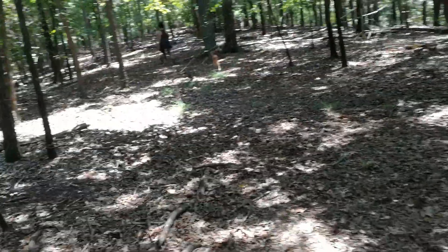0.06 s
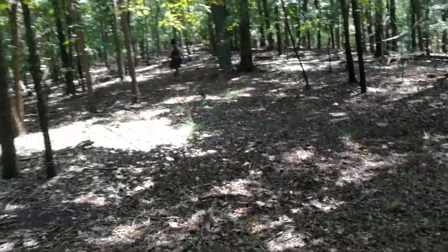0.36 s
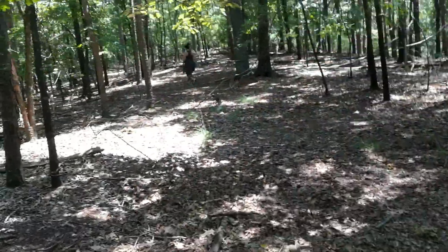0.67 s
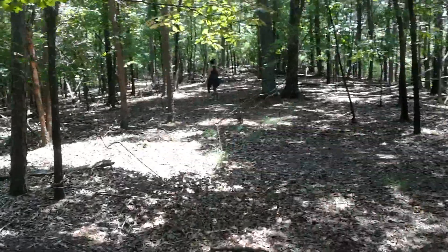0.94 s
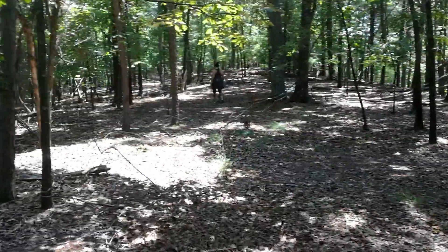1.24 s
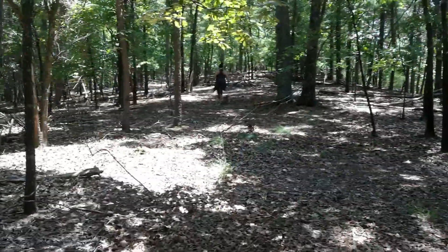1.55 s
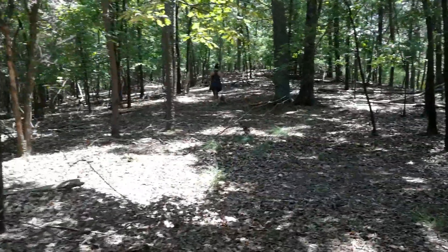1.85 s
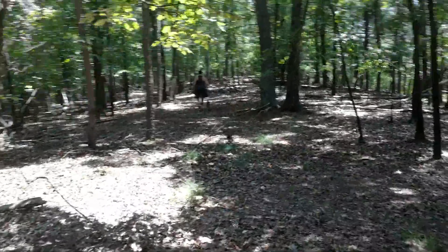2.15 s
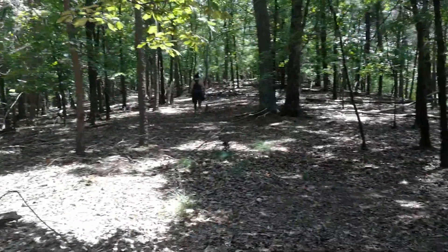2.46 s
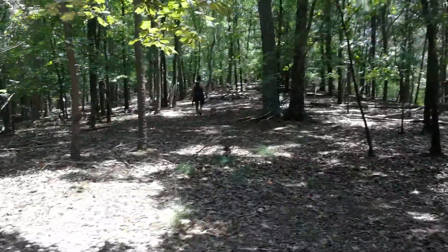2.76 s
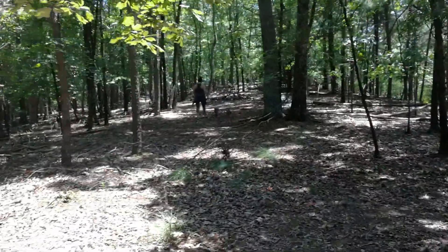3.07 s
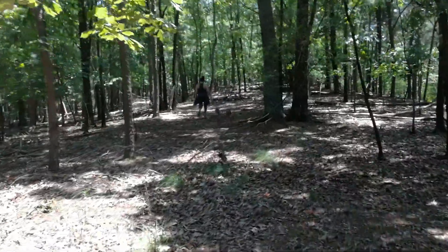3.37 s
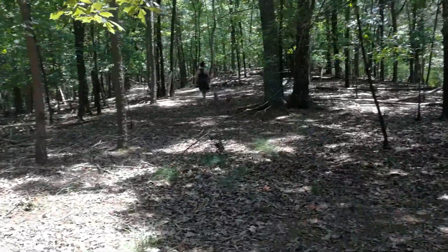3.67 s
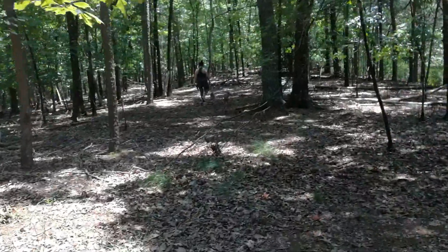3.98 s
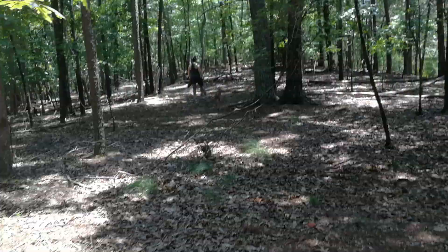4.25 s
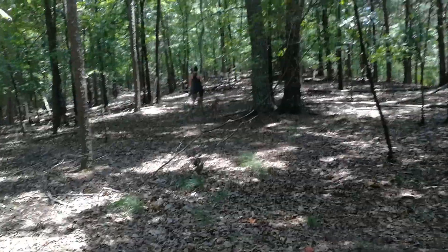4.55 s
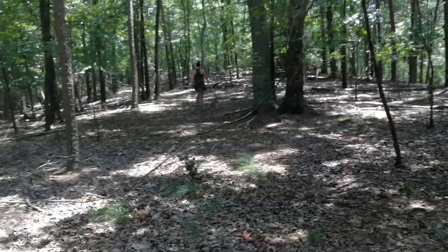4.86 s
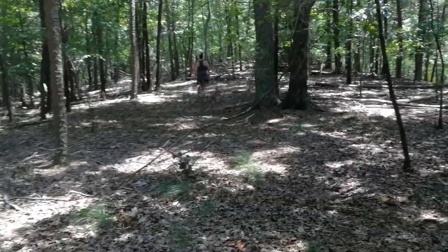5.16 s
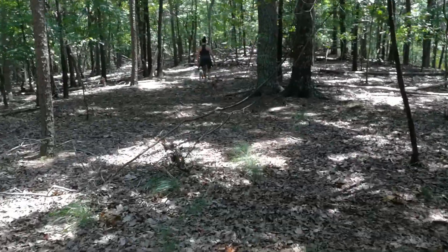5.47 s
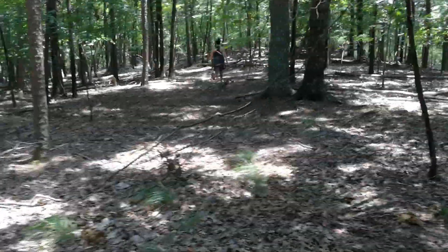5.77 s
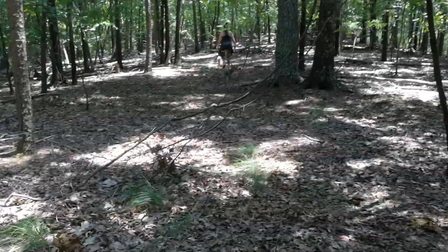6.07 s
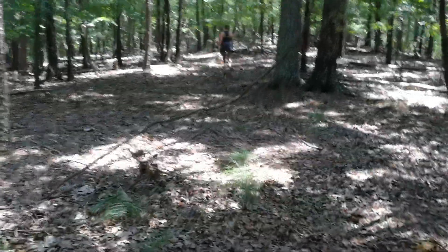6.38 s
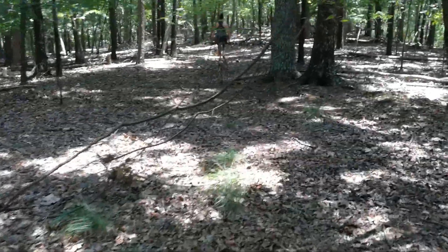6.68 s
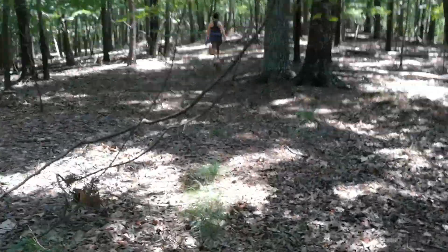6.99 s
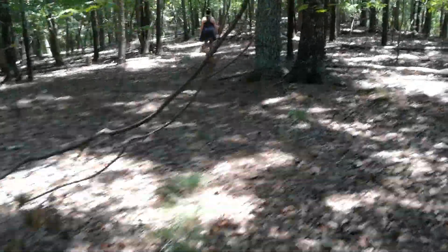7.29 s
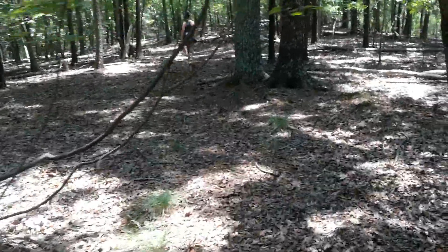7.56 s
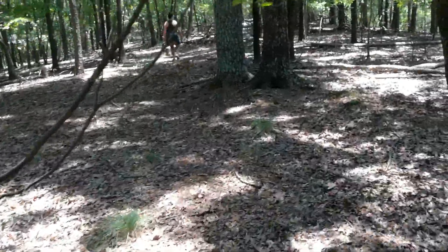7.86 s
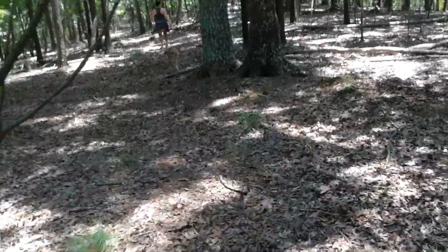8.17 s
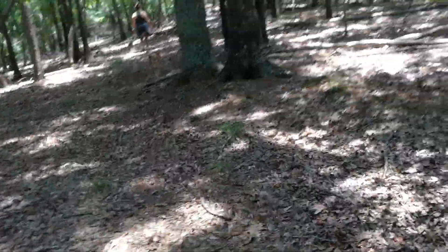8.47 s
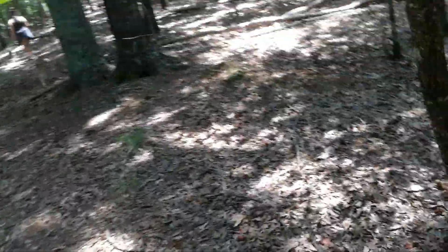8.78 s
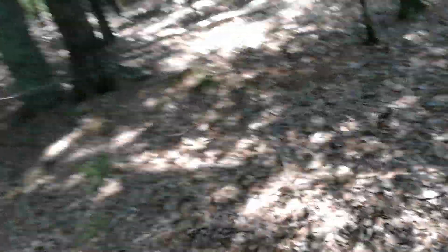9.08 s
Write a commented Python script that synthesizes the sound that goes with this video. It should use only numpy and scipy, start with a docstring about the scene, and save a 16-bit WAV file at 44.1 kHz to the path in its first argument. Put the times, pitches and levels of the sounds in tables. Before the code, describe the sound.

Slow footsteps move through dry leaves in a summer wood for about nine seconds, close below the microphone, roughly two steps a second. Brittle leaves crackle on top, the packed layer crunches below, and buried twigs give dull pops. Some heels thud on the soil and the microphone takes an occasional soft bump. The steps echo only faintly among the trees. They grow heavier from about 4.3 to 5 seconds, followed by a few sharp stalk snaps, then turn lighter from about 6.5 to 8. The last two steps, near 8.5 and 8.9 seconds, are loud and crisp, with twigs cracking. Cicadas buzz steadily in the background throughout, slightly to the left, and the nearest, shriller one swells from about 6 seconds. A light wind flutters and rumbles unevenly on the microphone, fading away after about 8 seconds.

```python
"""Slow footsteps crush dry leaves in a summer wood.
Under each foot brittle leaves crackle on top, the packed layer crunches below, and twigs snap and knock.
Some heels thud on the soil, and jolts bump the microphone. The steps echo faintly among the trees.
Behind them cicadas buzz steadily and a light wind flutters at the microphone."""
import sys
import numpy as np
from scipy import signal
from scipy.fft import rfft, irfft, next_fast_len
from scipy.io import wavfile
from scipy.ndimage import uniform_filter1d, map_coordinates

SR = 44100
rng = np.random.default_rng(int(sys.argv[2]) if len(sys.argv) > 2 else 0)


def int16_out(signal):
    """Quantize to a 16-bit WAV file."""
    q = np.round(np.clip(np.atleast_2d(signal).T, -1, 1) * 32767)
    wavfile.write(sys.argv[1], SR, q.astype(np.int16))


N = 402633

# Levels in the tables are relative: the functions turn them up or down in the mix.
# wind strength at the microphone: t/s, flutter level/dB, buffet level/dB
WIND_LEVELS = [(0.0, -39, -60), (0.05, -41, -47), (0.15, -48, -50), (0.66, -52, -65.5), (0.71, -39, -62),
               (0.81, -45, -62), (0.86, -47, -43), (0.94, -51, -69), (1.09, -51, -53.5), (1.19, -52, -71),
               (1.32, -42, -43), (1.83, -50, -64.5), (1.93, -37, -57), (2.26, -46.5, -59),
               (2.34, -48, -48.5), (2.64, -56, -65), (2.7, -59, -49.5), (2.84, -45, -53), (2.95, -64, -72),
               (3.05, -49, -62), (3.23, -46, -48), (3.31, -50, -61.5), (4.07, -52.5, -48), (4.17, -55, -62),
               (4.42, -44, -42), (4.6, -50.5, -58.5), (4.98, -53, -50), (5.36, -53, -63),
               (5.64, -42, -40.5), (5.8, -54.5, -61), (5.9, -44, -49), (6.03, -49.5, -62), (6.08, -47, -51),
               (6.28, -59, -50.5), (6.56, -48.5, -67), (6.87, -51.5, -49), (7.45, -57, -63),
               (7.53, -76, -69), (7.86, -43.5, -55), (8.01, -49.5, -51.5), (8.14, -77, -71),
               (8.52, -61, -63), (8.62, -76, -69.5), (9.13, -80, -72)]
# tone of the steady air, slow rumble, low flutter and gusty buffeting: f/Hz, level/dB
AIR_TONE = [(20, 2.5), (120, 5), (250, -3), (450, -12), (1000, -16), (1800, -12.5), (2500, -13),
            (8000, -22), (16000, -19)]
RUMBLE_TONE = [(15, -1), (30, 1), (45, -16), (80, -29)]
FLUTTER_TONE = [(20, -24), (32, -11), (44, 7.5), (55, 2), (80, -11), (140, -20.5), (220, -29.5), (400, -50)]
BUFFET_TONE = [(30, -28), (70, 5), (120, 5.5), (170, -2.5), (250, -14.5), (400, -36.5), (800, -35)]
# how alike background noise is left and right: f/Hz, likeness (1 same, 0 unrelated, -1 opposite)
STEREO_LIKENESS = [(100, 0.7), (300, 0.82), (550, -0.57), (1000, -0.23), (1700, 0.84), (2500, 0.066),
                   (8000, -0.044)]
# loudness of the cicadas: t/s, chorus level/dB, nearest cicada level/dB
CICADA_LEVELS = [(0, -59, -58), (1, -56.5, -54), (3, -57.5, -54.5), (4.7, -56, -52.5), (6, -57.5, -49.5),
                 (6.7, -56.5, -49.5), (7.5, -57, -46.5), (8.2, -55, -48.5), (9.13, -54.5, -45)]
# tone of the far chorus and of the nearest cicada: f/Hz, level/dB
CHORUS_TONE = [(2750, -24), (3050, -9), (3400, 1.5), (4100, 1), (4700, 3.5), (5500, 3.5), (7500, -4),
               (9000, -25), (10500, -14), (13000, -10), (16000, -46)]
NEAR_CICADA_TONE = [(4500, -20.5), (6000, -1.5), (6900, 4.5), (7600, 4), (8400, 0), (9300, -7),
                    (10800, -23), (13000, -15), (16000, -38)]
# single insects that stand out (silent unless start is before end): start/s, end/s, f/Hz, level/dB
SOLO_INSECTS = [(0, 4, 3080, -67.5), (0, 4.5, 6550, -64), (3.8, 8.1, 3740, -68), (4.3, 8.8, 5020, -59),
                (4.4, 7.3, 7900, -83), (6.8, 6.5, 3430, -53)]
# echo among the trunks: f/Hz, time to fade by 60 dB/s
ECHO_TIMES = [(200, 0.048), (2000, 0.28), (12000, 0.078)]
# how much louder the ground sounds on the left: f/Hz, left minus right/dB
GROUND_BALANCE = [(250, 2.5), (550, -1), (1100, -3.5), (2100, 1), (4000, 5.5), (8000, -2), (12000, 5)]
# how far ahead waves from the ground are on the left: f/Hz, phase lead/rad
GROUND_PHASE = [(0, -1), (1720, -0.5), (2670, 3.5), (4310, 8.5), (5770, 12.5), (8700, -6.0), (11600, -10.5),
                (16600, -4.5)]
# soft swishes, like clothing as a leg swings: middle t/s, half length/s, f/Hz, level/dB
SWISHES = [(0.008, 0.084, 1980, -49), (0.73, 0.14, 1775, -63), (0.914, .05, 1780, -58),
           (1.3, .07, 1776, -63), (2.348, 0.21, 1730, -66), (2.764, 0.32, 1800, -68.5),
           (3.628, 0.12, 1855, -64)]
# dull thuds of heels on soil, and deeper bumps as the microphone is jolted: t/s, level/dB, f/Hz
LOW_THUDS = [(0.05, -34, 110), (0.112, -42, 280), (0.853, -40, 140), (1.985, -40, 139), (3.241, -37, 576),
             (3.349, -51, 447), (3.909, -44, 550), (4.437, -41, 400), (4.901, -39, 420), (4.922, -31, 320),
             (5.036, -41, 307), (6.238, -39.5, 150), (6.759, -38, 129), (6.892, -41, 158),
             (8.50, -30.5, 666), (8.915, -33.5, 600)]
# twigs give way under the leaves: t/s, level/dB, f/Hz
TWIG_KNOCKS = [(0.309, -31.5, 1010), (0.477, -42.5, 1440), (0.534, -49, 904), (0.741, -34.5, 1860),
               (0.986, -28.5, 1150), (1.103, -38, 1330), (1.147, -39, 1470), (1.518, -26.5, 1620),
               (2.025, -31, 1790), (2.143, -23, 993), (3.242, -29, 1020), (3.348, -25.5, 1200),
               (3.478, -43, 1250), (3.602, -33.5, 1640), (3.831, -29.5, 1410), (4.033, -34, 1450),
               (4.349, -32, 1830), (4.436, -25, 1170), (4.58, -26, 1570), (4.678, -33, 1220),
               (4.713, -33, 1300), (4.976, -27.5, 1580), (5.037, -26, 890), (5.535, -43, 1120),
               (5.727, -29.5, 1040), (6.129, -29, 1400), (6.667, -43.5, 1690), (6.792, -31.5, 960),
               (6.845, -35.5, 1020), (7.181, -29, 1340), (7.406, -33, 1080), (7.64, -46, 1910),
               (7.689, -43, 1550), (8.366, -38, 2000), (8.502, -22, 960), (8.916, -25.5, 870)]
# dry stalks snap: t/s, level/dB, f/Hz
STALK_SNAPS = [(0.1101, -28, 6800), (1.5774, -33, 6070), (1.926, -32, 13500), (2.5838, -32, 11700),
               (3.2469, -28, 6900), (4.445, -25.5, 11100), (5.1434, -23, 8730), (5.174, -24.5, 9070),
               (5.218, -23.5, 13600), (5.8012, -39, 7450), (6.2487, -32, 6560), (8.4655, -17.5, 9400),
               (8.6775, -20, 7000)]
# a sole slaps into loose leaves: t/s, level/dB, time to fade by 60 dB/s, centre f/Hz
LEAF_SLAPS = [(0.109, -35, .09, 6500), (0.828, -29.5, 0.18, 9600), (0.996, -34, 0.11, 3300),
              (1.437, -28, 0.11, 11000), (1.50, -33.5, 0.36, 3800), (2.025, -42, .1, 7000),
              (3.227, -42, 0.24, 7000), (3.783, -32, 0.26, 9000), (4.2963, -28.5, 0.26, 8900),
              (4.395, -35, 0.097, 9700), (4.4375, -31.5, 0.09, 6000), (4.888, -30.5, 0.075, 6000),
              (4.903, -28, 0.13, 6960), (4.926, -26, 0.1, 9450), (5.699, -44, 0.077, 6000),
              (6.169, -38, 0.21, 5000), (6.793, -34, 0.056, 4970), (7.869, -36, 0.22, 10000),
              (8.9156, -24, 0.51, 6300), (8.977, -24.5, 0.16, 9000)]
# the swinging foot grazes the leaves: middle t/s, half length/s, level/dB, brittle leaf boost/dB
SCUFFS = [(0.024, 0.076, -56.5, -19), (0.395, 0.046, -62.5, 8.5), (1.098, 0.067, -57.5, 3.5),
          (5.52, 0.046, -64.5, 9.5), (6.703, 0.14, -68.5, -1), (7.534, 0.025, -62, 6),
          (8.293, 0.048, -66.5, 11.5), (8.903, .02, -51, 8)]
# footfalls: t/s, heel level/dB, weight delay/s, weight stay/s, weight level/dB, brittle leaf boost/dB
FOOTFALLS = [(0.108, -58.5, 0.087, 0.11, -51.5, 6.5), (0.817, -43.5, 0.12, 0.047, -49, 3.5),
             (1.368, -57, 0.062, .16, -46.5, 2), (1.895, -57, 0.15, 0.13, -48, 1.5),
             (2.584, -51, .07, 0.15, -56, -8), (3.223, -49, 0.11, 0.018, -55, 2.5),
             (3.72, -55, 0.084, 0.13, -48.5, 6), (4.29, -44, 0.19, 0.095, -49, 2.5),
             (4.886, -42.5, 0.098, 0.21, -49, 6), (5.612, -61, 0.12, 0.055, -48.5, 2),
             (6.044, -50, .14, 0.1, -51, -1.5), (6.77, -53, 0.082, 0.022, -57, -8),
             (7.334, -59.5, 0.045, 0.075, -54, 1.5), (7.815, -56, .14, 0.037, -54, 3.5),
             (8.464, -43, 0.11, 0.085, -50.5, 6.5), (8.906, -47, 0.022, 0.2, -50.5, 12.5)]
# tone of the litter (the packed layer of old leaves) and the brittle leaves on top: f/Hz, level/dB
LITTER_TONE = [(120, -65), (250, -11.5), (500, -14), (900, -1.5), (1600, 1), (2500, -3.5), (4000, -12.5),
               (7000, -77)]
BRITTLE_TONE = [(1000, -10), (2200, -3), (3500, 1), (5200, 0), (7000, -4), (9000, 7.5), (11500, 1),
                (15000, 3), (16000, -16)]

HEEL_ATTACK_S, HEEL_FALL_DB_PER_S = 0.0071, 117
LOAD_DB_PER_S, LIFT_DB_PER_S = 192, 172  # the weight rolls on and off
BRUSH_DB, BRUSH_DB_PER_S = -19, 220  # the sole brushes the top leaves as it lands
STIR_DB, STIR_DB_PER_S, SETTLE_DB_PER_S = -15.5, 50, 59  # leaves stir before the weight, settle after
LITTER_DB, BRITTLE_DB = 2, 3
TOP_HZ = 15950


def amp(db):
    """Turn decibels into a number to multiply a sound by."""
    return 10 ** (np.asarray(db) / 20)


def unit(x):
    """Scale a sound so its average strength (rms) is 1."""
    return x / np.sqrt(np.mean(x ** 2) + 1e-20)


def along(points, hz):
    """Read between (frequency, value) points, spacing octaves evenly."""
    freqs, values = np.transpose(points)
    return np.interp(np.log(hz + 1), np.log(freqs + 1), values)


def curves(rows):
    """Turn each column after the time into a curve with one value per sample."""
    times, *columns = np.transpose(rows)
    return [np.interp(np.arange(N) / SR, times, column) for column in columns]


def wobble(rate):
    """A smooth random curve that picks `rate` new values a second."""
    values = rng.standard_normal(int(N * rate / SR) + 4)
    return map_coordinates(values, [np.arange(N) * rate / SR], order=2)


def filtered(x, response):
    """Multiply each frequency in a sound by response(hz)."""
    size = next_fast_len(x.shape[-1] + 8192)
    return irfft(rfft(x, size) * response(np.fft.rfftfreq(size, 1 / SR)), size)[..., :x.shape[-1]]


def coloured(x, tone):
    """Shape a sound with (frequency, dB) points, then scale it to strength 1."""
    return unit(filtered(x, lambda hz: amp(along(tone, hz))))


def panned(db):
    """Left and right gains that make the left louder by db."""
    return amp(np.array([[1], [-1]]) * db / 2)


def add(track, start, sound):
    """Mix a sound into a track, `start` seconds in."""
    part = track[..., max(round(start * SR), 0):][..., :sound.shape[-1]]
    part += sound[..., :part.shape[-1]]


def rush(tone, patchy_db):
    """Stereo noise whose narrow bands swell and fade, alike on both sides in the bass, not the treble."""
    bands = signal.stft(rng.standard_normal((2, N)), nperseg=1024)[2]
    patches = uniform_filter1d(rng.standard_normal(bands.shape[1:]), size=3, axis=0)
    patches = uniform_filter1d(patches, size=110, axis=1)  # smooth over time
    pair = signal.istft(bands * amp(patchy_db * unit(patches)), nperseg=1024)[1][:, :N]
    width = lambda hz: np.arccos(np.clip(along(STEREO_LIKENESS, hz), -1, 1)) / 2
    mid, side = filtered(pair, lambda hz: np.array([np.cos(width(hz)), np.sin(width(hz))]))
    return coloured(np.array([mid + side, mid - side]), tone)


def wind():
    """Swirls of air beat unevenly on the microphone; gusts sharpen the beats and add loose buffeting."""
    flutter_db, buffet_db = curves(WIND_LEVELS)
    swirl_hz = 46.5 * np.exp(.105 * wobble(22))
    swirl_count = np.floor(np.cumsum(swirl_hz) / SR)
    swirls = np.diff(swirl_count, prepend=0) * amp(2.9 * wobble(30))  # one tap per swirl
    rumble = coloured(rng.standard_normal(N), RUMBLE_TONE)
    flutter = (coloured(swirls, FLUTTER_TONE) + amp(-19) * rumble) * amp(flutter_db - 1 + wobble(14))
    beats = coloured(swirls * amp(3.5 * wobble(40)), BUFFET_TONE)
    buffet = beats * amp(-9) + rush(BUFFET_TONE, patchy_db=-2.5) * amp(-5.5)
    buffet *= amp(buffet_db + 3.5 + 0.85 * wobble(17))
    lag_s = np.array([[1], [-1]]) * 0.00035  # the air reaches the right side first
    buffet = filtered(buffet, lambda hz: np.exp(-2j * np.pi * hz * lag_s))
    return flutter + buffet * panned(1) + amp(-62.5) * rush(AIR_TONE, patchy_db=1.5)


def cicadas():
    """Far insects blur into a hiss with a few thin voices; the nearest buzzes by clicking tiny drums."""
    chorus_db, near_db = curves(CICADA_LEVELS)
    t = np.arange(N) / SR
    hiss = rush(CHORUS_TONE, patchy_db=2.2)
    chorus = hiss * amp(chorus_db + 2 + 1.2 * wobble(6.1)) * panned(4.7)
    for start, end, hz, db in SOLO_INSECTS:
        swell = np.clip(np.minimum(t - start, end - t) / 0.2, 0, 1)
        rasp = np.array([wobble(190), wobble(190)])
        chorus += amp(db - 2) * swell * rasp * np.sin(2 * np.pi * hz * t)
    click_hz = 336 * (1 + 0.028 * wobble(13))
    buzz = 1 + 0.25 * np.sin(2 * np.pi * np.cumsum(click_hz) / SR)
    shrill = rush(NEAR_CICADA_TONE, patchy_db=2.4)
    nearest = shrill * buzz * amp(near_db - 1.5 + 0.32 * wobble(8.2))
    return chorus + nearest * panned(6)


def tree_echo(sound):
    """Sound bounces among the trunks into a short blur that lasts longest at middle pitches."""
    hz, t, bands = signal.stft(rng.standard_normal((2, SR // 2)), SR, nperseg=256)
    fade = amp(-60 * t / along(ECHO_TIMES, hz)[:, None])
    tail = signal.istft(bands * fade, SR, nperseg=256)[1]
    return signal.fftconvolve(sound, tail / np.linalg.norm(tail[0]), axes=1)[:, :N]


def swishes():
    """A brief rub swells and fades around one pitch."""
    track, t = np.zeros(N), np.arange(N) / SR
    rub = np.array([wobble(300), wobble(300)])
    for middle, half, hz, db in SWISHES:
        active = abs(t - middle) < 3 * half
        angle = 2 * np.pi * hz * t[active]
        swell = amp(db) * np.exp(-((t[active] - middle) / half) ** 2)
        track[active] += swell * (rub[0, active] * np.sin(angle) + rub[1, active] * np.cos(angle))
    return track


def low_thuds():
    """Heels thud on soil and jolts of the microphone bump deeper: short, dull, with no clear note."""
    track, t = np.zeros(N), np.arange(SR // 10) / SR
    rise_and_fade = (1 - np.exp(-t / 0.0014)) * amp(-60 * t / 0.069)
    for start, db, hz in LOW_THUDS:
        tone = [(hz / 3, -24), (hz / 2, -1), (hz, 0), (hz * 2, -9), (hz * 5, -35)]
        thud = coloured(rng.standard_normal(len(t)), tone)
        add(track, start, amp(db - 3) * thud * rise_and_fade)
    return track


def twig_knocks():
    """A buried twig breaks with a dull pop, its last fibres follow, and the leaves settle."""
    track, t = np.zeros(N), np.arange(SR // 20) / SR
    pop = lambda cycles: np.exp(-(cycles / 0.77) ** 2) * np.cos(2 * np.pi * (cycles + rng.random()))
    for start, db, hz in TWIG_KNOCKS:
        delay_s = rng.uniform(0.00313, 0.00787)
        fibres = amp(-9.5) * pop((t - delay_s) * hz * rng.uniform(0.62, 1.85))
        settle = coloured(rng.standard_normal(len(t)), LITTER_TONE) * amp(-21 - 60 * t / .03)
        add(track, start, amp(db - 1) * (pop((t - .0015) * hz) + fibres + settle))
    return track


def stalk_snaps():
    """A dry stalk parts with one sharp tick and a spray of splinters around the same pitch."""
    track, t = np.zeros((2, N)), np.arange(SR // 50) / SR
    crack = np.exp(-((t - .0008) / 0.00029) ** 2)
    splinters = amp(-4 - 60 * t / 0.01)
    for start, db, hz in STALK_SNAPS:
        tone = [(hz / 5, -20), (hz * 0.62, -2), (hz, 0), (hz * 2, -7)]
        snap = coloured(rng.standard_normal((2, len(t))), tone) * (crack + splinters)
        add(track, start + 0.00034, amp(db + 5) * snap / abs(snap).max(axis=1, keepdims=True))
    return track


def leaf_slaps():
    """A whole patch of leaves collapses at once, in a shower too dense to hear single ticks."""
    track, t = np.zeros((2, N)), np.arange(SR // 5) / SR
    for start, db, fade_s, hz in LEAF_SLAPS:
        tone = [(hz / 12, -22), (hz / 3, -6), (hz, 0), (hz * 3.5, -5), (hz * 4, -14)]
        shower = coloured(rng.standard_normal((2, len(t))), tone)
        add(track, start, amp(db - 2) * shower * amp(-60 * t / fade_s))
    return track


def breaks(per_s, top_hz, life_s, spread_db, scatter, samples):
    """Tiny breaks at random times, each a fading ring with its own pitch, strength and direction."""
    draws = rng.random((int(per_s * N / SR), 5))
    when, pitch, strength, phase, place = draws.T[:, :, None]
    t = np.arange(samples) / SR
    fade = amp(spread_db * np.minimum(-np.log(strength + 1e-9), 5)) * np.exp(-t / life_s)
    index = ((when * N).astype(int) + np.arange(samples)).ravel()
    angle = 2 * np.pi * (pitch * top_hz * t + phase)
    # an off-centre break reaches left and right out of step, by up to `scatter` radians
    sides = [fade * np.sin(angle + sign * scatter * (place - .5)) for sign in (-1, 1)]
    return np.array([np.bincount(index, side.ravel(), N + samples)[:N] for side in sides])


def stray_ticks(brittle):
    """Around each step bent leaves let go with thin ticks, and small twigs with faint, dull pops."""
    stirred_db = uniform_filter1d(20 * np.log10(brittle + 1e-6), size=SR // 3)
    ticks = breaks(per_s=90, top_hz=15400, life_s=0.00027, spread_db=0.5, scatter=2.3, samples=64)
    pops = breaks(per_s=14, top_hz=2200, life_s=0.00085, spread_db=1.5, scatter=0.63, samples=160)
    thin = coloured(ticks, [(3000, -5), (9000, -2), (14000, 2)]) * amp(-30.5 + 0.54 * stirred_db)
    return thin + coloured(pops, LITTER_TONE) * amp(-24.5 + 0.88 * stirred_db)


def avalanches(per_s, life_s, depth):
    """One leaf giving way takes its neighbours with it: the loudness jumps, then falls back."""
    starts = (rng.random(N) < per_s / SR) * np.minimum(rng.exponential(size=N), 3)
    return unit(1 + depth * signal.lfilter([1], [1, -np.exp(-1 / (life_s * SR))], starts))


def foot_pressure():
    """How hard both leaf layers are crushed: the heel strikes, the weight rolls on, stays and lifts."""
    t = np.arange(0, N, 16) / SR
    litter, brittle = np.zeros((2, len(t)))
    for start, heel_db, delay, stay, weight_db, boost_db in FOOTFALLS:
        age = np.maximum(t - start, 0)
        landed = np.minimum(age / HEEL_ATTACK_S, 1)
        until_weight = np.maximum(start + delay - t, 0)
        since_lift = np.maximum(age - delay - stay, 0)
        brush = amp(heel_db + BRUSH_DB - BRUSH_DB_PER_S * abs(t - start))
        heel = landed * amp(heel_db - HEEL_FALL_DB_PER_S * age)
        weight = landed * amp(weight_db - LOAD_DB_PER_S * until_weight - LIFT_DB_PER_S * since_lift)
        stir = amp(weight_db + STIR_DB - STIR_DB_PER_S * until_weight - SETTLE_DB_PER_S * since_lift)
        power = brush ** 2 + heel ** 2 + weight ** 2 + stir ** 2
        litter += power
        brittle += power * amp(boost_db) ** 2
    for middle, half, db, boost_db in SCUFFS:
        power = (amp(db) * np.exp(-((t - middle) / half) ** 2)) ** 2
        litter += power
        brittle += power * amp(boost_db) ** 2
    return [np.interp(np.arange(N) / SR, t, np.sqrt(power)) for power in (litter, brittle)]


def crushed_leaves(litter, brittle):
    """The foot's weight breaks the packed litter and the brittle leaves on top of it."""
    surges = avalanches(per_s=55, life_s=0.0058, depth=0.59) * amp(1.3 * wobble(35))
    packed = breaks(per_s=2400, top_hz=5020, life_s=0.00043, spread_db=1, scatter=0.4, samples=96)
    blades = breaks(per_s=8000, top_hz=16700, life_s=0.00014, spread_db=1.5, scatter=4.77, samples=32)
    # stems and stiff veins seldom break, so each pops or ticks on its own
    stems = breaks(per_s=65, top_hz=3596, life_s=0.0016, spread_db=2, scatter=0.33, samples=256)
    veins = breaks(per_s=100, top_hz=15650, life_s=0.0012, spread_db=0, scatter=1.6, samples=96)
    crunch = coloured((unit(packed) + amp(-6) * unit(stems)) * surges, LITTER_TONE)
    crackle = coloured((unit(blades) + amp(-8) * unit(veins)) * surges, BRITTLE_TONE)
    return crunch * amp(LITTER_DB) * litter + crackle * amp(BRITTLE_DB) * brittle


def scene():
    """Steps just below the microphone, a little different left and right; insects and wind all round."""
    balance = lambda hz: panned(along(GROUND_BALANCE, hz))
    phase_shift = lambda hz: np.exp(.5j * np.array([[1], [-1]]) * along(GROUND_PHASE, hz))
    litter, brittle = foot_pressure()
    walking = crushed_leaves(litter, brittle) + leaf_slaps() + low_thuds() + twig_knocks()
    walking += stray_ticks(brittle) + swishes()
    steps = filtered(walking, lambda hz: balance(hz) * phase_shift(hz))
    steps += filtered(stalk_snaps(), balance)
    return steps + amp(-16.5) * tree_echo(steps) + cicadas() + wind()


def record(dry):
    """Cut away all treble above TOP_HZ."""
    return filtered(dry, lambda hz: hz < TOP_HZ)


dry = scene()
out = record(dry)
int16_out(out)
```